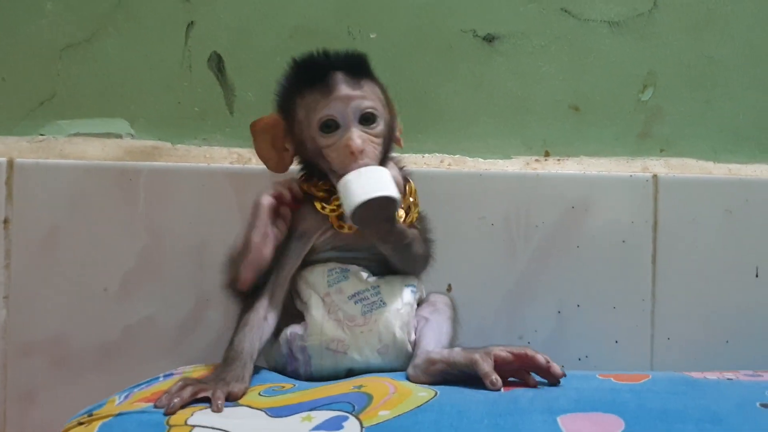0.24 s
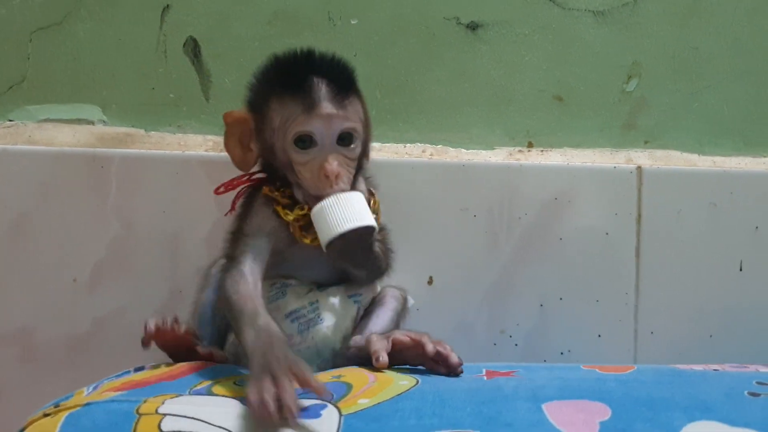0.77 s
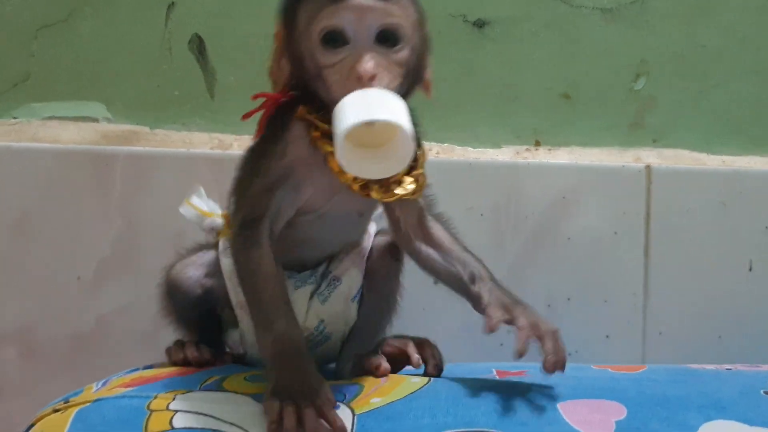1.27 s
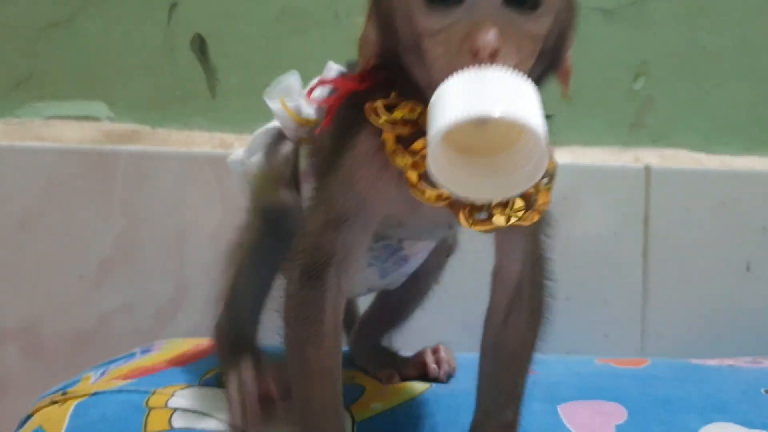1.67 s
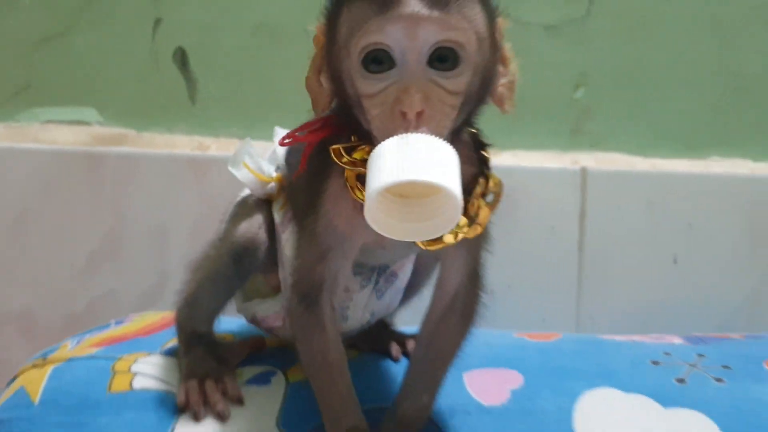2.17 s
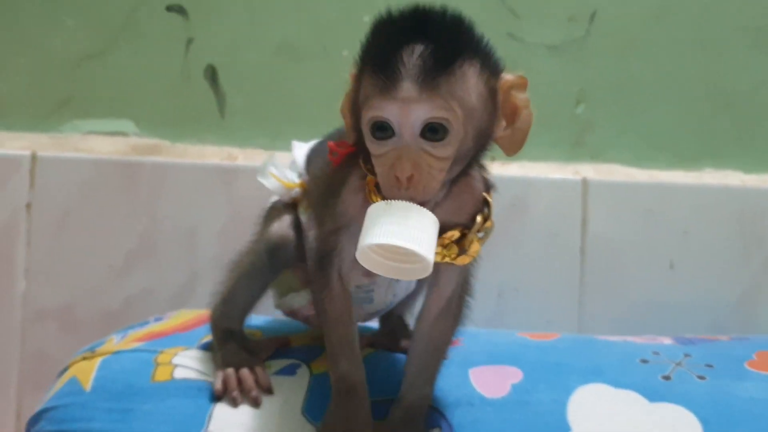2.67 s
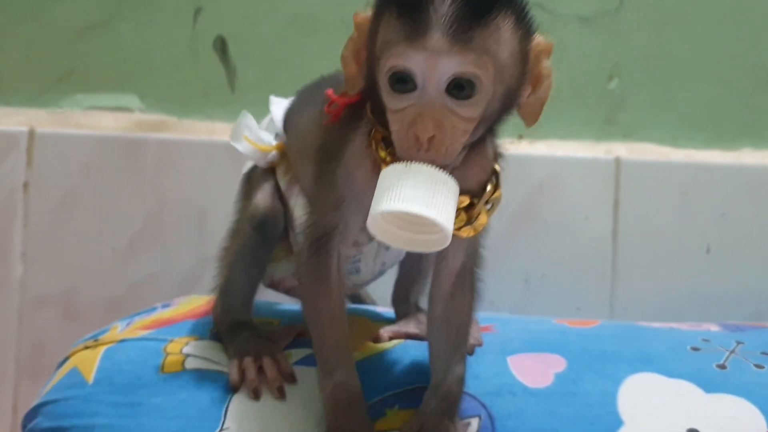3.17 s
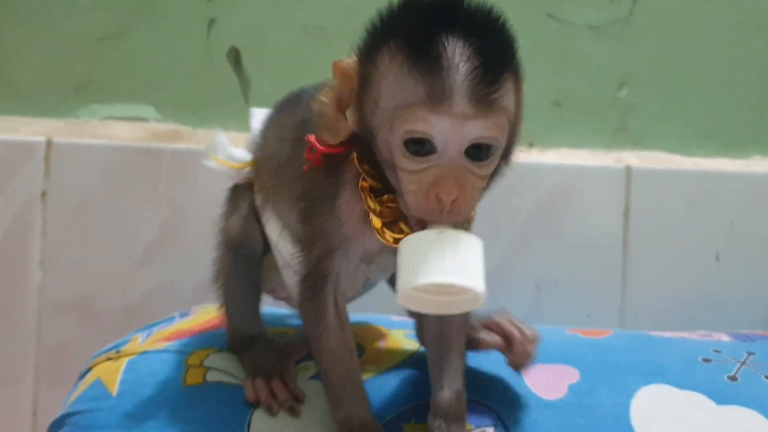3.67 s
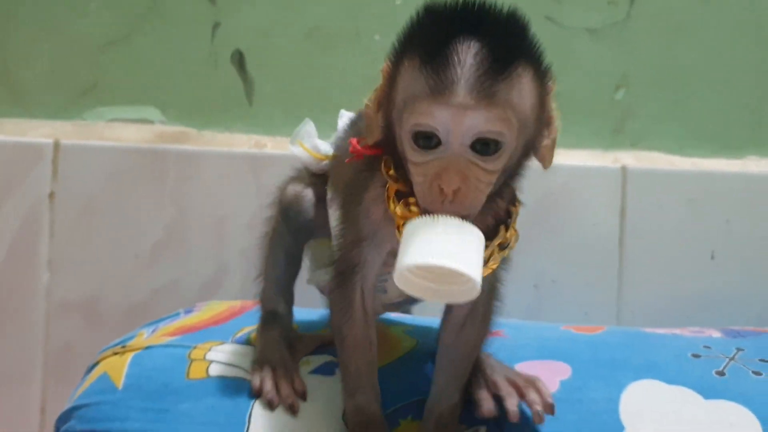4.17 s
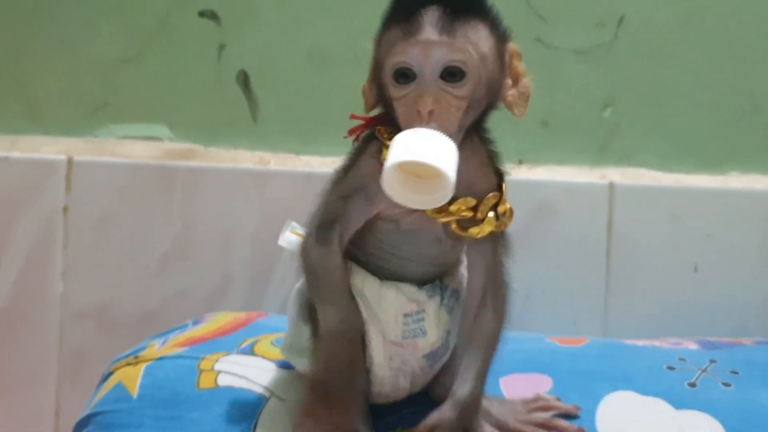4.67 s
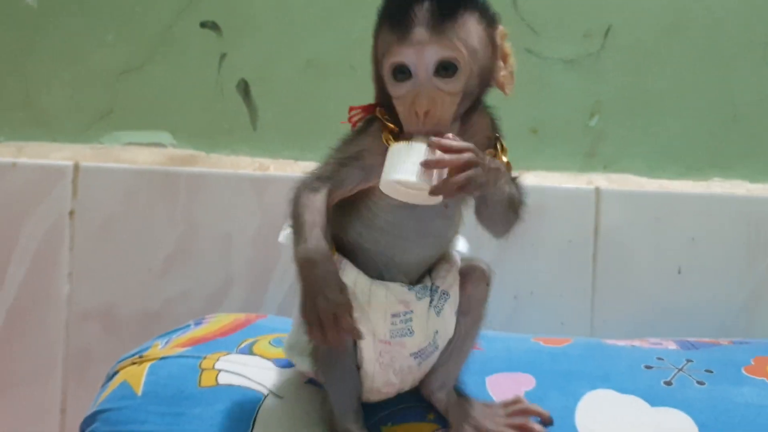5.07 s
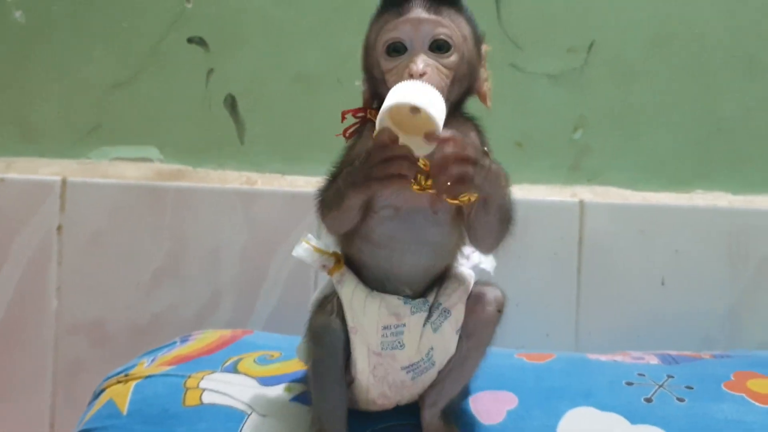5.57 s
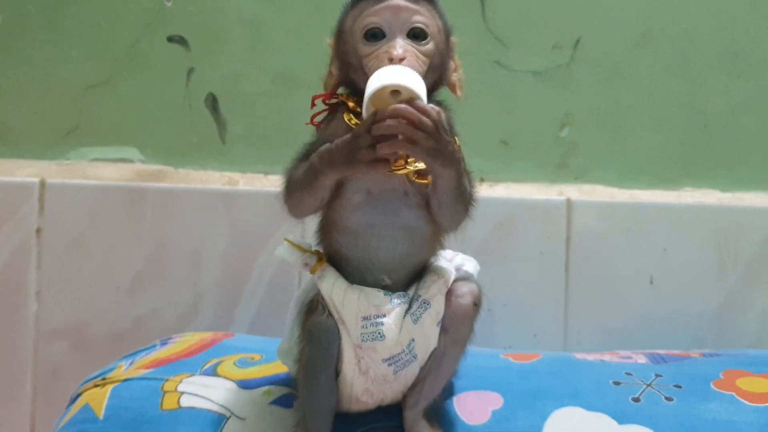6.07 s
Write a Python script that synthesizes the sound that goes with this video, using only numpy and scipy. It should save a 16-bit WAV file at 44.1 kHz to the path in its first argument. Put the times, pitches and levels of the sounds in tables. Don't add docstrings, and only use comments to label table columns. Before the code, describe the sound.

A close stereo pickup in a small tiled room, with a quiet murmur of house and street and a faint low motor hum that wavers in strength. Cloth rubs at the start, with a small tick and dull knock at 0.13 s. At 0.3 s a baby monkey gives a very short, clear, high squeak whose pitch arches and falls. Light ticks and rubbing follow. From 1.45 s a thin closed-mouth whine rises and swells, a crisp tick at 1.56 s, bursting at 1.72 s into a second short squeak, slightly higher and louder. Faint mattress thuds come at 2.0 and 2.4 s, then gentle scuffs from 3.2 to 4.2 s. At 4.35 s a plastic cap cracks hard on teeth, bright and dry, with a softer click just after and low thuds until 4.45 s. Stronger cloth rustling around 5 s settles into soft rubbing, with one faint thud at 5.55 s, until about 6.4 s.

```python
import sys
import numpy as np
from scipy import signal
from scipy.fft import rfft, irfft, next_fast_len
from scipy.io import wavfile
from scipy.ndimage import uniform_filter1d, map_coordinates

SR = 44100
rng = np.random.default_rng(int(sys.argv[2]) if len(sys.argv) > 2 else 0)


def rack_gain(trim_db):
    fader = np.asarray(trim_db, float)
    return 10 ** (fader / 20)


def generate_wav(signal):
    frames = np.transpose(np.atleast_2d(signal))
    scaled = np.clip(frames, -1, 1) * 32767
    pcm = np.round(scaled).astype(np.int16)
    wavfile.write(sys.argv[1], SR, pcm)


N = 278623
TOP_HZ = 15850

# (start [s], length [s], top pitch [Hz], pitch arch [Hz/ms^1.5], level [dB])
SQUEAKS = [
    (.3045, .048, 1221, .4, -28),
    (1.7162, .056, 1291, 1.27, -26.5),
]
# (time [s], pitch [Hz], level [dB])
WHINE = [
    (1.447, 1085, -45.5),
    (1.539, 1154, -47),
    (1.551, 1166, -43),
    (1.629, 1204, -37),
    (1.659, 1214, -33.5),
    (1.711, 1236, -34),
]
# (frequency [Hz], gain [dB])
FIRST_MOUTH = [(900, -6), (1200, 1), (2400, -7), (3600, -15), (4550, -20), (4880, -8), (6000, -9),
               (7300, -23), (8500, -16), (9600, -36), (10900, -8), (12250, 7), (13400, -19), (15700, -20)]
# (frequency [Hz], gain [dB])
SHUT_MOUTH = [(1000, 0), (1250, 0), (2250, -21), (2450, -16), (3300, -8), (3700, -17), (5000, -37),
              (8500, -44), (9800, -33), (11000, -41), (12200, -33), (13400, -29), (15500, -32)]
# (frequency [Hz], gain [dB])
SECOND_MOUTH = [(1000, -4), (1280, 5.5), (2150, 3.5), (2550, -3.5), (3800, -13.5), (4550, -2), (4930, 4.5),
                (6400, -11.5), (7500, -17), (9000, -4.5), (10200, -8), (12250, 3.5), (13200, -10),
                (15500, -23)]
# (time [s], peak [dB], hollow of the cap [dB], brightness [dB/octave])
BITES = [
    (4.3539, -13.5, -0.5, 1),
    (4.3596, -50, -9, -4),
    (4.377, -27, -29, -2.5),
    (4.395, -53, -14, 5),
]
# (frequency [Hz], level [dB], t60 [s])
CAP_MODES = [(875, -7.5, 0.019), (2050, -9, 0.012), (3140, -9, 0.035), (3290, -4.5, 0.022),
             (4210, -14.5, 0.036), (5200, -9, 0.031), (5500, -5, 0.028), (6140, 3.5, 0.014),
             (9000, -21, .015), (9800, -17, 0.017), (11200, -8, .01), (11900, -1.5, 0.0089)]
# (time [s], peak [dB], centre [Hz], width [Hz], t60 [s])
TICKS = [(0.1283, -30, 6950, 2500, 0.01), (.6928, -42.5, 2650, 1490, 0.013),
         (.8789, -52, 5500, 4000, 0.013), (1.556, -25.5, 6700, 9100, 0.013),
         (2.0164, -47, 4240, 5000, 0.024), (3.363, -44, 8000, 6000, 0.012), (3.5967, -53, 5000, 6000, .012),
         (.305, -32.5, 3000, 6000, 0.034), (1.7165, -27, 2200, 3000, 0.032),
         (4.3738, -38.5, 2050, 500, 0.032), (4.377, -37, 5170, 3000, 0.037)]
# (time [s], length [s], centre [Hz], width [Hz], level [dB])
SCUFFS = [(3.181, 0.3, 4420, 330, -67), (3.5, 0.12, 5700, 350, -73.5), (0.903, 0.034, 9300, 2000, -56),
          (1.6, 0.18, 5860, 900, -60.5), (1.5, 0.062, 11600, 1500, -58), (2.1, 0.038, 7500, 2500, -63),
          (3.328, 0.14, 7350, 2000, -65), (3.334, .18, 11500, 3000, -72), (3.747, 0.19, 4950, 3000, -63),
          (3.734, 0.11, 11900, 2500, -65), (3.997, 0.17, 4500, 2000, -62), (4.1, 0.042, 6900, 3000, -58.5),
          (4.09, 0.065, 11600, 3500, -62.5)]
# (time [s], peak [dB], pitch [Hz], t60 [s])
THUDS = [
    (.129, -31, 720, 0.014),
    (2.016, -47.5, 126, 0.19),
    (2.411, -43, 87, 0.17),
    (4.356, -36, 117, 0.11),
    (4.4, -34.5, 71, 0.087),
    (4.43, -32.5, 300, 0.023),
    (4.448, -35.5, 73, 0.072),
    (5.547, -44.5, 181, 0.066),
]
# (time [s], length [s],
# frequency [Hz], level [dB])
TINKLES = [
    (.10, 0.025, 6330, -56),
    (1.546, 0.0098, 1273, -33),
    (1.548, 0.0089, 2290, -40),
    (2.44, 0.037, 5700, -68),
    (3.959, .13, 383.7, -56.5),
]
# (middle [s], length [s], cloth [dB], fine fur [dB])
STROKES = [
    (.12, 0.62, -62, -73.5),
    (0.803, 0.25, -68.5, -84),
    (1.527, 0.46, -64, -78),
    (2.732, .5, -70.5, -78),
    (3.4, .45, -69.5, -77.5),
    (3.9, 0.73, -65.5, -76.5),
    (4.32, 0.26, -64.5, -74),
    (4.96, 0.66, -61.5, -73),
    (6.15, 1, -69, -78.5),
]
# (middle [s], length [s], level [dB])
SHIFTS = [
    (.25, 0.64, -59),
    (1.594, 0.34, -59.5),
    (3.1, 0.26, -71.5),
    (4.17, 0.43, -56.5),
    (5.0, 0.96, -57.5),
    (5.91, 0.99, -58),
]
# (frequency [Hz], density [dB/Hz])
CLOTH = [(1500, -74), (2500, -13), (3800, -8.5), (5000, -7), (7500, -8.5), (9000, -12), (12000, -52),
         (15800, -48)]
# (frequency [Hz], density [dB/Hz])
FUR = [(4000, -81), (6500, -31), (8500, -30), (10000, -2.5), (12500, -4), (15800, -11.5)]
# (frequency [Hz], density [dB/Hz])
WEIGHT = [(60, -27), (110, -4.5), (200, -5), (450, -9), (1200, -10), (3000, -20.5), (6000, -101)]
# (frequency [Hz], density [dB/Hz])
MURMUR = [(15, -28), (30, -25), (70, 1), (144, -14), (235, -16), (572, -16), (1060, -13.5), (1870, -20),
          (2730, -24.5), (3490, -38.5), (7220, -30.5), (11100, -34), (13200, -38), (15800, -67)]
# (frequency [Hz], level [dB])
HUM = [(48.4, -57), (70.0, -60), (102.3, -61)]
# (middle [s], length [s], change [dB])
LOADS = [
    (1.1, 0.38, -3),
    (1.45, 0.49, 3),
    (3.598, 0.31, -14.5),
    (4.326, 0.078, -16),
    (5.1, .9, 4),
    (5.78, .25, -4),
    (6.0, 0.37, 5.5),
]
# (frequency [Hz], likeness [0-1])
ALIKE = [(100, 0.83), (500, 1), (1000, 0.31), (2000, 0.59), (3200, 0.04), (5000, 0.054), (10000, 0.027)]
# (frequency [Hz], left minus right [dB])
PORTS = [(60, -3), (180, -5), (550, -3), (1650, -7.5), (4970, -8), (15000, -10.5)]
# (frequency [Hz], t60 [s])
ROOM = [(300, 0.36), (1200, 0.35), (2500, 0.33), (4650, 0.44), (5000, 0.4), (5300, 0.27), (9000, 0.21),
        (12200, 0.26), (15000, 0.41)]


def squeak(s, length, hz, arch, db):
    top_ms, hold_ms = 15, 24
    end_ms = 1000 * length
    ms = np.arange(-3, end_ms + 10, .5)
    bend = np.abs(ms - top_ms) ** 1.5
    past = bend * (ms > top_ms)
    slack_start = 1 - .05 * np.exp(-ms / 1.8).clip(0, 2)
    pitch = hz * slack_start - arch * (past + .6 * (bend - past))
    pitch -= .6 * (ms - end_ms + 8).clip(0) ** 2
    tired = .1 * (ms - hold_ms).clip(0) ** 1.5
    level = db - 15 * np.exp(-ms / 1.9) - tired - 4 * (ms - end_ms).clip(0)
    parting = -3 * np.exp(-ms / 3)
    shutting = .33 * (arch * past - 95).clip(0)
    opening = parting + .8 * tired - shutting
    return np.transpose([s + ms / 1000, pitch, level, opening])


def whine():
    edge_s, dulls = .012, .52
    (s0, hz0, _), (s1, hz1, _) = WHINE[0], WHINE[-1]
    rows = [(s0 - edge_s, hz0, -75), *WHINE, (s1 + edge_s / 2, hz1, -75)]
    top = max(db for *_, db in rows)
    return [(s, hz, db, dulls * min(top - db, 15)) for s, hz, db in rows]


def call(rows, mouth, jitter, flutter_db):
    s, pitch, level, opening = np.transpose(rows)
    t = np.arange(s[0], s[-1], 1 / SR)
    size = len(t)
    hz = uniform_filter1d(np.interp(t, s, pitch), size=150) * (1 + jitter * wobble(146, size))
    k = np.arange(1, 17)[:, None]
    flutter = flutter_db * np.array([wobble(105, size) for _ in k])
    lips_db = np.interp(t, s, opening) * np.clip(np.log2(k) - 1, 0, 1)
    phase = k * 2 * np.pi * np.cumsum(hz) / SR + 2 * np.pi * rng.random(k.shape)
    tones = rack_gain(along(mouth, k * hz) + flutter + lips_db) * np.sin(phase)
    voice = np.sqrt(2) * (tones * (k * hz < TOP_HZ)).sum(0)
    air = irfft(rfft(rng.standard_normal(size)) * rack_gain(along(mouth, np.fft.rfftfreq(size, 1 / SR))), size)
    out = np.zeros(N)
    add(out, s[0], rack_gain(np.interp(t, s, level)) * (voice + rack_gain(-26) * air))
    return out


def cap():
    hollow_hz, hollow_t60, hollow_delay_s = 1480, .013, .0012
    out, t = np.zeros(N), np.arange(SR // 8) / SR
    for s, db, hollow_db, tilt_db in BITES:
        ring = 0
        for hz, mode_db, t60 in CAP_MODES:
            gain_db = mode_db + rng.normal(0, 2.0) + tilt_db * np.log2(hz / 5000)
            ring = ring + rack_gain(gain_db - 60 * t / t60) * np.sin(2 * np.pi * hz * t)
        crack = 0.47 * rack_gain(-60 * t / 0.024) * band(len(t), 5500 * rack_gain(tilt_db), width_hz=3800)
        add(out, s - .001, rack_gain(db - 4.5) * (ring + crack) * (1 - np.exp(-t / 0.00091)))
        hollow = np.sin(2 * np.pi * hollow_hz * t)
        add(out, s + hollow_delay_s, struck(t, db + hollow_db, hollow_t60, attack_s=0.00064) * hollow)
    return out


def ticks():
    out, t = np.zeros(N), np.arange(SR // 20) / SR
    for s, db, hz, width_hz, t60 in TICKS:
        add(out, s - .001, struck(t, db, t60, attack_s=0.00062) * band(len(t), hz, width_hz))
    return out


def scuffs():
    out = np.zeros(N)
    for s, length, hz, width_hz, db in SCUFFS:
        size = round(length * SR)
        level = rack_gain(db + 2.6 * wobble(75, size)) * np.hanning(size) ** 0.24
        add(out, s, level * band(size, hz, width_hz))
    return out


def thuds():
    out, t = np.zeros(N), np.arange(SR // 4) / SR
    for s, db, hz, t60 in THUDS:
        add(out, s, struck(t, db + 3.5, t60, attack_s=0.003) * np.sin(2 * np.pi * hz * t))
    return out


def tinkles():
    out = np.zeros(N)
    for s, length, hz, db in TINKLES:
        size = round(length * SR)
        t = np.arange(size) / SR
        level = rack_gain(db + 2.8 * wobble(46, size)) * np.hanning(size) ** 0.11
        add(out, s, level * np.sin(2 * np.pi * hz * t + hz / 3000 * wobble(120, size)))
    return out


def movement():
    cloth_db = swells(-73, [(s, length, db) for s, length, db, _ in STROKES])
    fur_db = swells(-90, [(s, length, db) for s, length, _, db in STROKES])
    weight_db = swells(-74.5, SHIFTS)
    grain = rack_gain(1.04 * wobble(45) + 1.1 * wobble(300))
    rubs = rack_gain(cloth_db + 1) * rush(CLOTH, patchy_db=2.0) + rack_gain(fur_db + 9) * rush(FUR, patchy_db=-0.5)
    rumble = rack_gain(weight_db + 2.5 + 1.8 * wobble(13)) * rush(WEIGHT, patchy_db=1.0)
    return grain * rubs + rumble


def background():
    t = np.arange(N) / SR
    hum = 0
    for hz, db in HUM:
        hum = hum + rack_gain(db + 3.5 * wobble(4.11)) * np.sin(2 * np.pi * hz * t + 1.87 * wobble(7))
    load_db = dense(sum(db * bump(s, length) for s, length, db in LOADS))
    return rack_gain(-54) * rush(MURMUR, patchy_db=1.82) + rack_gain(-56.5 + load_db) * unit(hum)


def room(x, gap_ms, build_s):
    hz, t, z = signal.stft(rng.standard_normal((2, SR // 2)), SR, nperseg=256)
    soak_db = 1.4 * hz[:, None] / 10000
    build = 1 - np.exp(-t / build_s) / 1.4
    decay = rack_gain(-60 * t / along(ROOM, hz)[:, None] - soak_db)
    tail = signal.istft(z * decay * build, SR, nperseg=256)[1]
    late = np.pad(x, (round(gap_ms * SR / 1000), 0))[None]
    return signal.oaconvolve(late, tail / np.linalg.norm(tail[0]), axes=1)[:, :N]


def placed(pair, lead_ms, pan_db):
    side = np.array([[.5], [-.5]])
    return rack_gain(pan_db * side) * filtered(pair, lambda hz: np.exp(2j * np.pi * hz * side * lead_ms / 1000))


def rush(spectrum, patchy_db):
    z = signal.stft(rng.standard_normal((2, N)), nperseg=512)[2]
    field = rng.standard_normal(z.shape[1:])
    for axis in (0, 1):
        field = uniform_filter1d(field, size=10, axis=axis)
    pair = signal.istft(z * rack_gain(patchy_db * unit(field)), nperseg=512)[1][:, :N]

    def mid_side(hz):
        turn = np.arccos(np.clip(along(ALIKE, hz), -1, 1)) / 2
        return rack_gain(along(spectrum, hz)) * [np.cos(turn), np.sin(turn)]

    mid, side = filtered(pair, mid_side)
    return unit(np.array([mid + side, mid - side]))


def band(size, hz, width_hz):
    f = np.fft.rfftfreq(size, 1 / SR)
    damping = (f * width_hz) ** 2
    resonance = damping / ((hz ** 2 - f ** 2) ** 2 + damping)
    return unit(irfft(rfft(rng.standard_normal(size)) * resonance, size))


def struck(t, db, t60, attack_s):
    return rack_gain(db - 60 * t / t60) * (1 - np.exp(-t / attack_s))


def swells(rest_db, rows):
    power = rack_gain(2 * rest_db) + sum(rack_gain(2 * db) * bump(s, length) for s, length, db in rows)
    return dense(10 * np.log10(power))


def bump(middle, length):
    t = np.arange(N // 100 + 2) * 100 / SR
    return np.exp(-(2 * (t - middle) / length) ** 2)


def dense(slow):
    return np.interp(np.arange(N) / 100, np.arange(len(slow)), slow)


def wobble(rate, size=N):
    knots = rng.standard_normal(int(size * rate / SR) + 4)
    return map_coordinates(knots, [np.arange(size) * rate / SR])


def along(points, hz):
    f, v = np.transpose(points)
    return np.interp(np.log(hz + 1), np.log(f + 1), v)


def filtered(x, response):
    m = next_fast_len(N + 8192)
    return irfft(rfft(x, m) * response(np.fft.rfftfreq(m, 1 / SR)), m)[..., :N]


def unit(x):
    return x / np.sqrt(np.mean(x ** 2) + 1e-20)


def add(track, s, x):
    part = track[round(s * SR):][:len(x)]
    part += x[:len(part)]


def scene():
    first = call(squeak(*SQUEAKS[0]), FIRST_MOUTH, jitter=0.00078, flutter_db=3.5)
    thin = call(whine(), SHUT_MOUTH, jitter=.001, flutter_db=1.3)
    second = call(squeak(*SQUEAKS[1]), SECOND_MOUTH, jitter=0.00097, flutter_db=2.8)
    small = ticks() + scuffs() + thuds() + tinkles()
    # (sound, lead [ms], pan [dB], room [dB])
    near = [(first, .045, 0.1, -11.5),
            (thin, .1, 3, -9),
            (second, .18, 2.2, -14),
            (cap(), .2, -.8, -15),
            (small, .15, .1, -13)]
    mix = placed(background() + movement(), lead_ms=0.29, pan_db=3.0)
    for x, lead_ms, pan_db, wet_db in near:
        mix = mix + placed(x, lead_ms, pan_db) + rack_gain(wet_db) * room(x, gap_ms=4, build_s=0.0046)
    return mix


def roll_off(x):
    return signal.sosfilt(signal.butter(12, 16820, fs=SR, output="sos"), x)


def record(dry):
    def ports(hz):
        balance = rack_gain(along(PORTS, hz) * np.array([[.5], [-.5]]))
        return balance / (1 + (hz / TOP_HZ) ** 200)

    return roll_off(filtered(dry, ports))


dry = scene()
out = record(dry)
generate_wav(out)
```